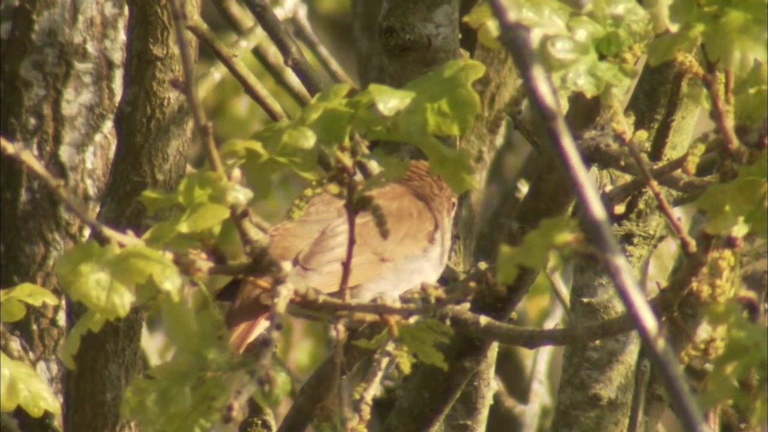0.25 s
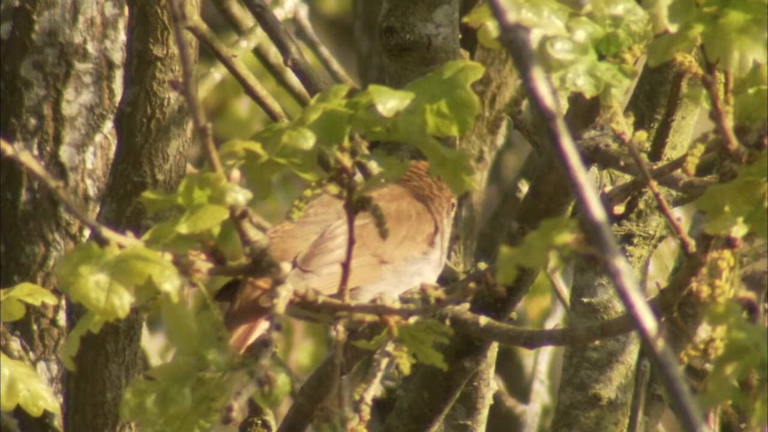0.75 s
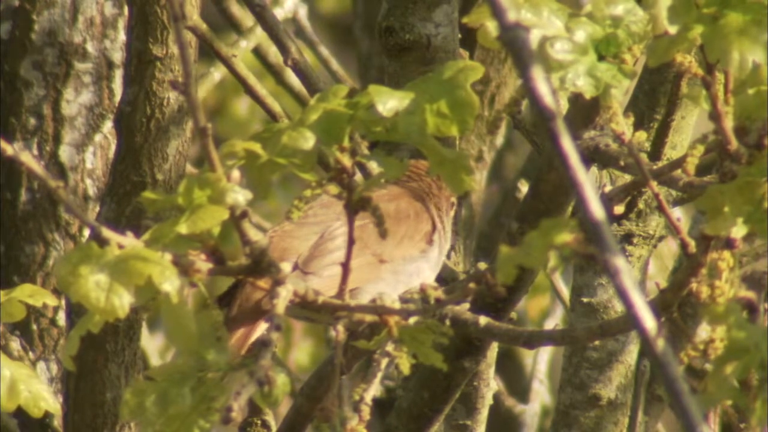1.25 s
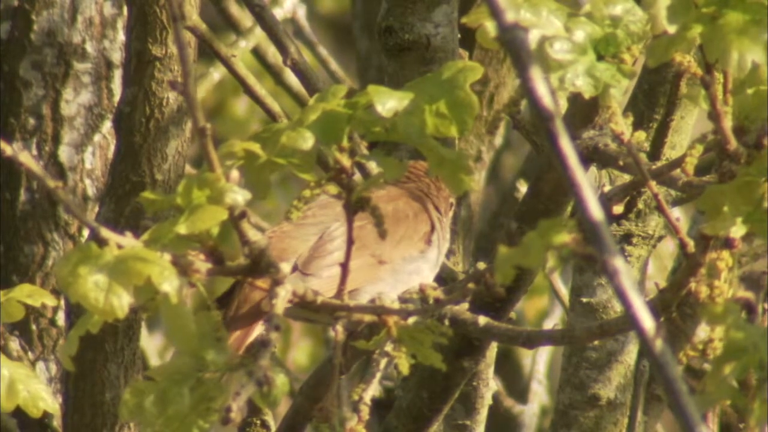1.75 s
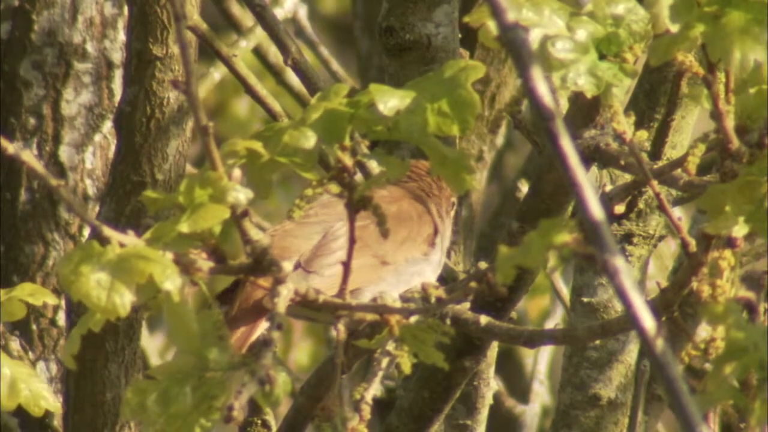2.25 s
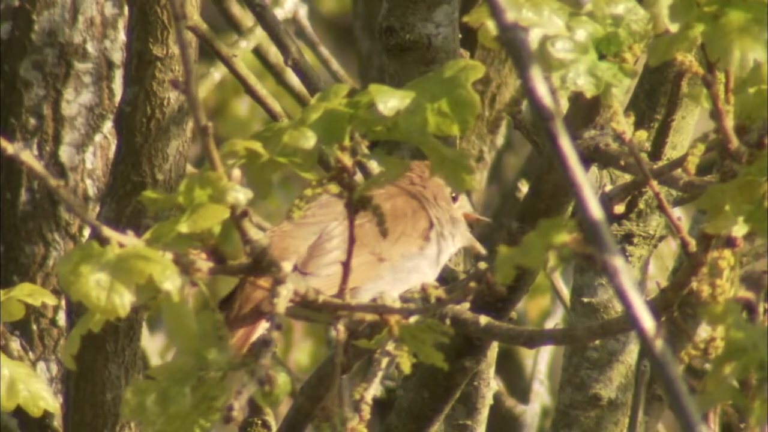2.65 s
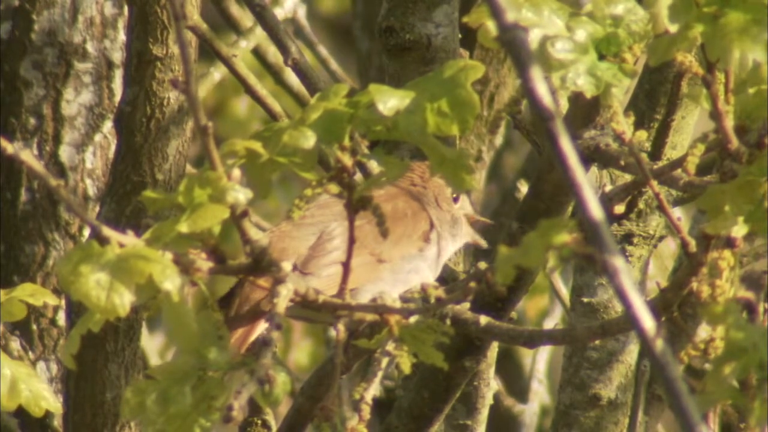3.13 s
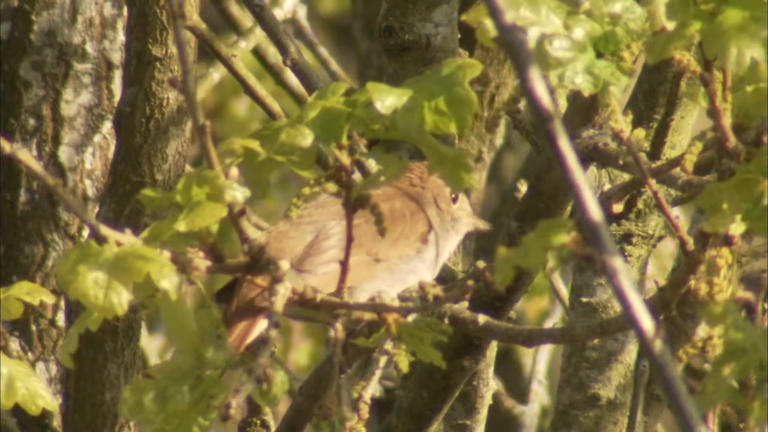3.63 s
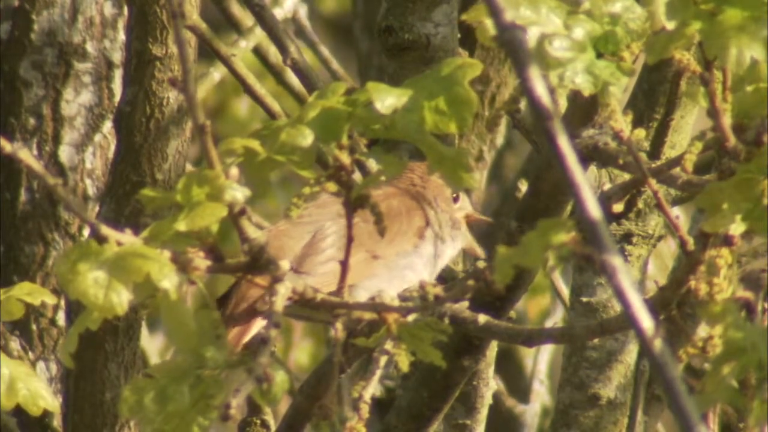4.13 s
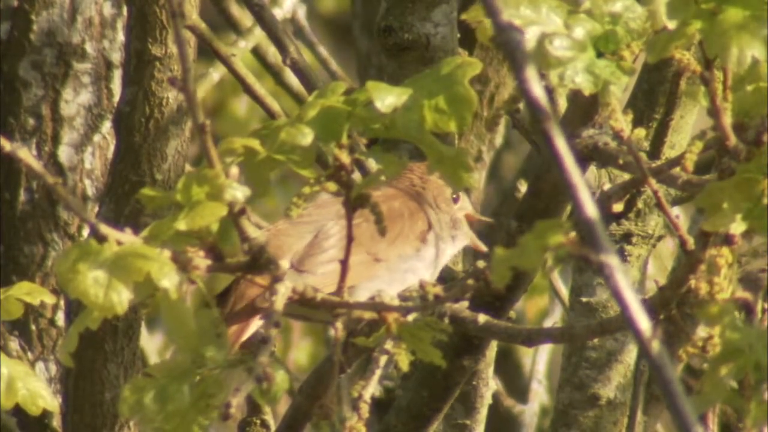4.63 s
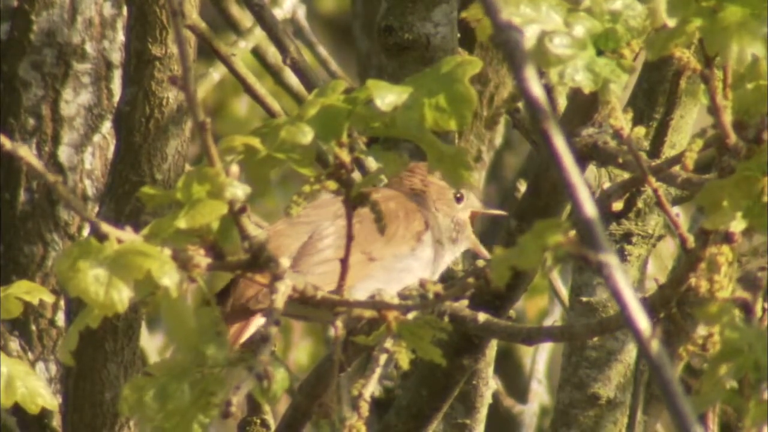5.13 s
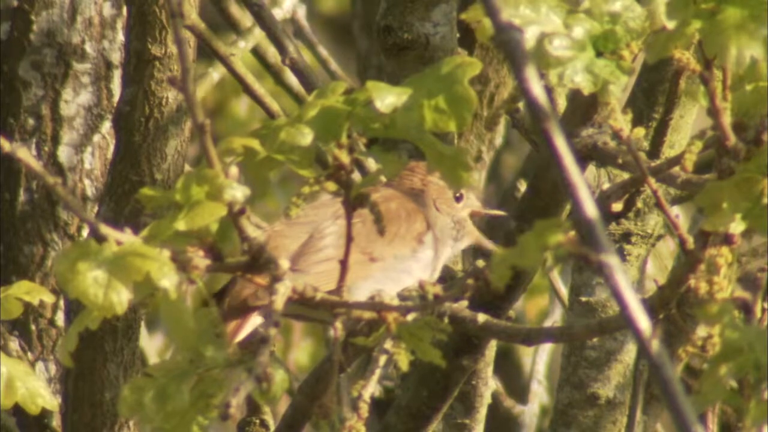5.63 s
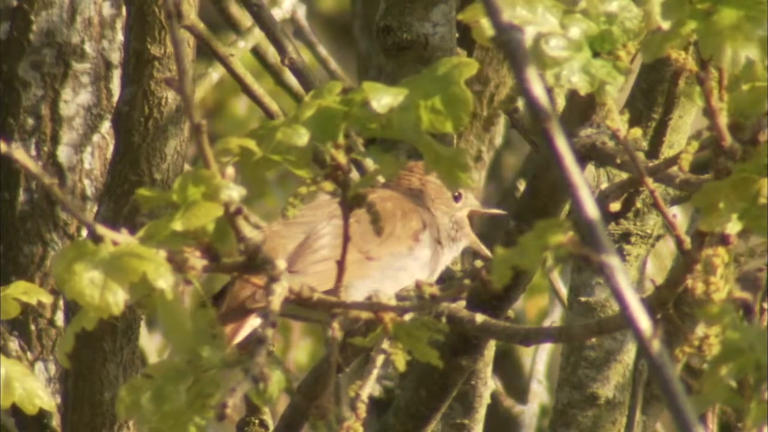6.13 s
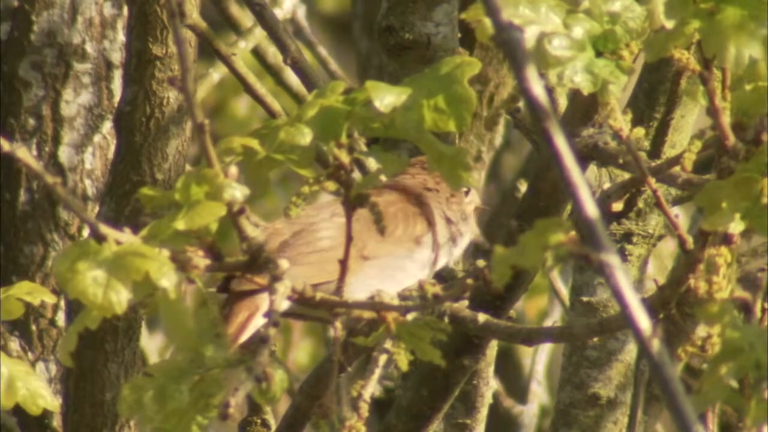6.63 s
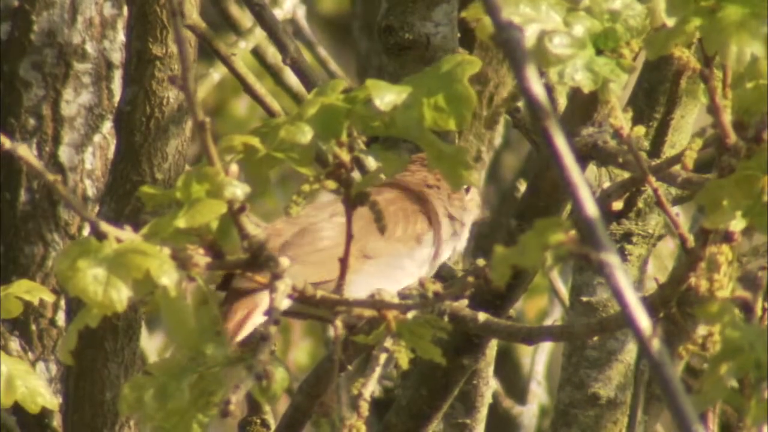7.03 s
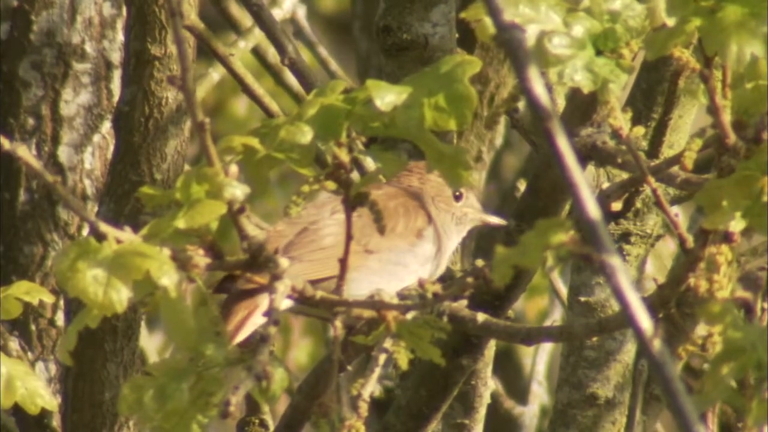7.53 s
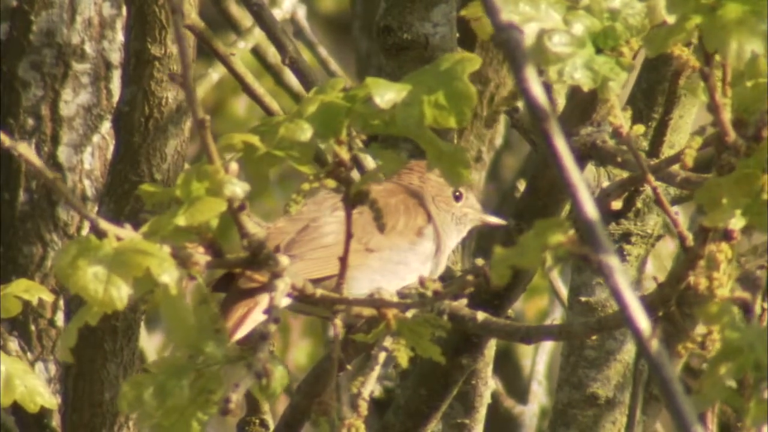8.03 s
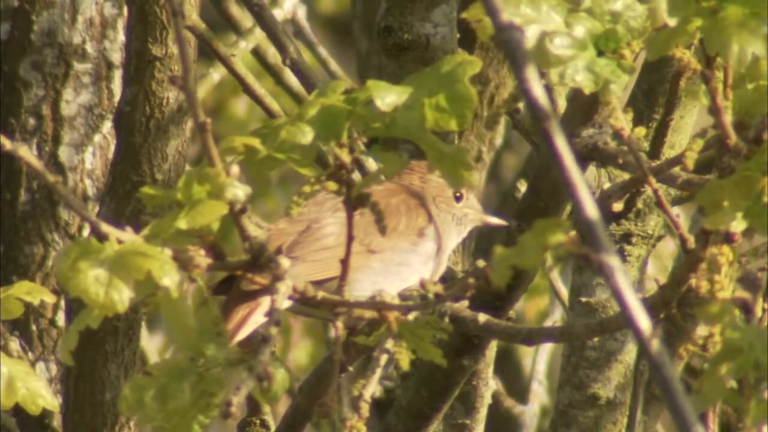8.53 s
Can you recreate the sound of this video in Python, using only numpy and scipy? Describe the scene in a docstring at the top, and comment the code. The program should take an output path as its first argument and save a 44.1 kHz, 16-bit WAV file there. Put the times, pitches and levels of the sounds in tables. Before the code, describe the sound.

A nightingale swells through a series of long high sliding whistles, then six loud low liquid loops, while a nearby bird warbles and rasps in echoing woodland.

```python
"""Nightingale in a spring thicket

A nightingale swells through a series of long high whistles, each sliding down onto its pitch, then breaks
into six loud low loops. A neighbour warbles, ticks and rasps across it; more birds sing deeper in the wood.
Birds are nearly pure tones on gliding pitch paths, and the wood's echo is two decaying bursts of noise.
Coloured noise makes the air, the rumble and the blurred chorus; a sine makes the faint hum.
"""
import sys
import numpy as np
from scipy import signal
from scipy.fft import rfft, irfft, next_fast_len
from scipy.io import wavfile
from scipy.ndimage import uniform_filter1d, map_coordinates

SR = 44100
rng = np.random.default_rng(int(sys.argv[2]) if len(sys.argv) > 2 else 0)


def int16_out(signal):
    """Quantize to a 16-bit WAV file."""
    q = np.round(np.clip(np.atleast_2d(signal).T, -1, 1) * 32767)
    wavfile.write(sys.argv[1], SR, q.astype(np.int16))


N = 386757
TIME = np.arange(N) / SR  # seconds

# Note levels are set ahead of envelopes, wavering and the echo mix; note pitches ahead of wavering.
# Colours are relative: each noise is scaled to unit power.

# still air, colour: [hz, db_per_hz]
AIR = [(20, -2), (55, 4.5), (90, 3), (200, 1), (400, -9), (600, -8.5), (850, -6), (1050, -10.5),
       (1300, -16.5), (2500, -21), (6000, -20), (9000, -33), (14500, -32)]
AIR_DB = -66
# distant rumble, level over time before its trim: [time_s, level_db]
RUMBLE_DB = [(0.0, -73), (1.02, -54.5), (1.63, -63), (1.95, -53), (2.88, -52.5), (5.15, -64.5),
             (5.59, -54.5), (5.71, -63), (6.42, -56), (6.47, -64.5), (7.5, -58), (7.64, -66), (8.72, -66),
             (8.77, -75)]
# distant rumble, colour: [hz, db_per_hz]
RUMBLE = [(30, -31), (70, -19.5), (100, -11), (122, -0.5), (135, 1), (150, -1), (180, -2.5), (200, -15),
          (225, -3), (250, 4), (295, -2), (335, -16.5), (500, -20), (1000, -73)]
# blurred chorus of the whole wood, level over time: [time_s, level_db]
CHORUS_DB = [(0, -65), (.7, -78), (1.2, -76), (1.7, -72), (2.3, -71), (2.8, -66), (3.4, -68), (3.9, -68),
             (4.4, -72.5), (5.2, -80.5), (6.2, -81), (7.6, -70.5), (8.7, -68.5)]
# blurred chorus, colour: [hz, db_per_hz]
CHORUS = [(900, -57), (1300, -14), (1800, -31), (2600, -10.5), (3500, 3.5), (4500, 5.5), (5500, -9),
          (7200, -22.5), (8500, -23), (11000, -71)]
# hum, level over time: [time_s, level_db]
HUM_DB = [(0, -82), (1.5, -72), (3, -75.5), (4.2, -70), (5.3, -78), (7, -78.5), (8.7, -73)]
HUM_HZ = 59.4
# the preamplifiers' own hiss, colour: [hz, db_per_hz]
HISS = [(1000, -5), (4000, -15), (8000, 1.5), (14500, -0.5)]
HISS_DB, CUTOFF_HZ = -84, 15000

# neighbour's slurs: [start_s, length_s, level_db, from_hz, to_hz, halfway_share]
SLURS = [(0, 0.049, -59, 5000, 3900, 0.96), (.043, 0.027, -43.5, 3530, 4000, 0.7),
         (.076, 0.026, -41, 3770, 2860, 0.19), (.11, 0.058, -40.5, 3335, 3427, 0.66),
         (.229, 0.017, -52, 2450, 2230, 0.8), (.306, 0.043, -45, 2774, 2662, 0.13),
         (.484, 0.035, -53, 4200, 3650, 0.43), (4.878, 0.024, -36, 4270, 3430, 0.73),
         (5.197, .036, -55.5, 10300, 7500, 0.34), (5.258, 0.023, -44, 4400, 6170, 0.84),
         (5.266, 0.05, -54.5, 2410, 3210, 0.08), (5.316, 0.028, -38, 3310, 5600, .68),
         (5.382, 0.021, -54, 2550, 2620, 0.24), (5.408, 0.026, -59, 1840, 1650, 0.46),
         (5.575, .05, -58, 2000, 1712, 0.09), (6.056, 0.014, -44, 4610, 2800, .38),
         (6.594, 0.016, -44.5, 4490, 4510, 0.3), (7.185, 0.052, -46.5, 3590, 4620, 0.3),
         (7.232, 0.019, -54, 6200, 9800, 0.8), (7.292, .016, -44, 3960, 4080, 0.6),
         (7.371, 0.018, -49, 3920, 3800, 0.4), (7.236, 0.025, -37, 3300, 5250, 0.17),
         (7.282, .016, -44, 3630, 9600, 0.4), (7.363, 0.01, -42.5, 4210, 9500, 0.6),
         (7.425, 0.016, -42.5, 2980, 4300, 0.5), (7.901, 0.0082, -48.5, 4390, 4440, .5),
         (7.913, 0.0056, -42, 5140, 5100, .5), (7.927, .012, -40, 7500, 5570, 0.06),
         (7.944, 0.0086, -44, 7420, 5350, .25), (7.961, 0.045, -40.5, 5640, 2660, 0.48),
         (8.108, 0.043, -38, 2770, 3830, 0.56), (8.363, 0.042, -41, 7530, 4450, 0.86),
         (8.6, 0.036, -54, 2160, 1940, 0.56), (8.69, 0.034, -37.5, 4540, 4890, 0.1),
         (8.722, 0.041, -36.5, 4200, 2780, 0.7)]
# neighbour's arched notes: [start_s, length_s, level_db, foot_hz, top_hz]
ARCHES = [(.245, 0.055, -44, 2415, 3606), (5.012, 0.072, -48.5, 1532, 2404),
          (6.143, 0.088, -48.5, 1590, 2420), (7.501, 0.052, -36, 3530, 4674),
          (7.63, 0.085, -50.5, 1573, 2330), (8.051, 0.025, -44.5, 2810, 4400),
          (8.083, 0.016, -37, 3140, 3666), (8.214, 0.033, -43, 3500, 5680),
          (8.244, 0.04, -42.5, 3550, 5090), (8.247, .04, -48, 4560, 7620), (8.488, 0.02, -52, 3300, 4120),
          (8.497, 0.014, -45, 2440, 3080), (8.581, 0.031, -54, 3130, 4160), (8.586, 0.01, -44, 2420, 3120)]
# neighbour's ticks, whipped up and straight down again: [start_s, length_s, level_db, foot_hz, top_hz]
TICKS = [(.44, 0.038, -49, 3285, 4790), (4.692, 0.037, -52, 3090, 6070), (5.497, 0.01, -48.5, 3620, 7300),
         (5.664, 0.009, -53, 3800, 7540), (6.356, 0.042, -47.5, 3800, 12100),
         (6.583, .044, -47, 3900, 12340), (8.341, 0.028, -46.5, 6600, 8450)]
# neighbour's burry, trilled notes: [start_s, length_s, level_db, from_hz, to_hz]
BURRS = [(.404, 0.012, -54.5, 2490, 2230), (2.563, .08, -56.5, 4410, 4230),
         (7.513, 0.032, -52.5, 5900, 5860), (8.512, 0.018, -56, 2280, 2170),
         (8.515, 0.017, -59, 3070, 2760), (8.6, .026, -56, 2118, 2020), (8.666, 0.0246, -41.5, 4740, 4300),
         (8.7, 0.025, -66, 6040, 5980)]
# neighbour's hoarse rasps: [start_s, length_s, level_db, from_hz, to_hz]
RASPS = [(7.172, 0.059, -50, 3630, 5560), (7.289, .034, -40.5, 3800, 4600),
         (7.368, 0.032, -40.5, 3710, 4640)]

# slurs deeper in the wood: [start_s, length_s, level_db, from_hz, to_hz]
FAR_SLURS = [(0, 0.076, -65, 7100, 6080), (0, 0.059, -62.5, 2830, 2860), (.15, .05, -68, 5350, 4900),
             (.2, 0.065, -71.5, 5070, 4640), (.178, 0.048, -70.5, 7200, 6230), (.57, .06, -76, 5750, 6530),
             (1.09, 0.067, -62.5, 2510, 1880), (1.095, 0.1, -74, 7900, 7530), (1.6, .03, -68, 6000, 8200),
             (1.29, 0.033, -68, 7960, 7360), (1.4, .08, -75, 3450, 4050), (2.16, 0.031, -67, 6760, 5640),
             (2.545, .05, -69, 6500, 5800), (3.18, 0.092, -77, 7600, 7100), (3.38, 0.15, -70, 7250, 6000),
             (3.6, 0.08, -71.5, 6980, 5600), (4.35, 0.17, -63, 4390, 3730), (4.555, 0.076, -68, 6200, 5970),
             (4.578, 0.066, -64, 2710, 1860), (4.93, 0.071, -66, 1700, 2410),
             (5.36, 0.078, -65, 3030, 2440), (5.91, 0.14, -62.5, 3300, 3980),
             (3.97, 0.045, -64, 4940, 3740), (4.02, 0.045, -63, 3700, 4400), (4.0, 0.1, -73, 6500, 6150),
             (6.07, 0.072, -68.5, 6450, 6320), (6.24, .06, -63, 2600, 3110),
             (6.36, 0.065, -61.5, 3350, 3170), (6.35, 0.21, -69.5, 7280, 6090),
             (6.67, 0.047, -60, 4260, 3920), (7.73, 0.11, -63.5, 4480, 3700),
             (7.775, 0.032, -69, 7500, 7240)]
# far arched notes: [start_s, length_s, level_db, foot_hz, top_hz]
FAR_ARCHES = [(1.78, .15, -60, 3080, 3797), (2.02, 0.16, -61, 3140, 3680), (2.33, .12, -63.5, 3410, 3900),
              (3.06, 0.11, -76, 6300, 6950), (3.23, 0.15, -72, 6030, 6760), (3.73, 0.46, -75.5, 7060, 7350),
              (8.16, 0.11, -63.5, 2130, 2330)]
# far pointed notes: [start_s, length_s, level_db, foot_hz, top_hz, apex_share]
FAR_PEAKS = [(1.435, 0.076, -57, 3500, 7100, 0.28), (1.6, 0.092, -56, 3320, 7000, 0.28),
             (2.265, 0.034, -60, 2570, 3550, 0.7), (2.39, 0.064, -62.5, 2320, 3500, 0.4),
             (2.525, 0.095, -65.5, 2500, 3500, 0.55), (3.67, .115, -61, 2380, 3500, 0.6),
             (3.84, 0.13, -64.5, 2260, 3450, 0.8), (4.01, 0.14, -65, 2300, 3530, 0.62)]
# a far run of scoops: [start_s, length_s, level_db, base_hz]
SCOOPS = [(2.635, 0.21, -62.5, 2350), (2.895, .095, -54, 3305), (3.068, .1, -55, 3370),
          (3.265, .115, -57.5, 3290), (3.45, 0.16, -55, 3185)]
# the scoops' shared shape, at even steps: [pitch_ratio to base_hz]
SCOOP = [1.22, 1, 1.04, 1.4, 1.72]
# a far run of rising hooks: [start_s, length_s, level_db, base_hz]
HOOKS = [(.728, 0.097, -67.5, 4950), (.9, 0.11, -67.5, 4800), (1.08, .085, -60.5, 4850),
         (1.26, .08, -57, 4910)]
# the hooks' shared shape, at even steps: [pitch_ratio to base_hz]
HOOK = [1.1, .99, 1.2, 1.3, 1.41, 1.46]
# the farthest whistler: [start_s, length_s, level_db, from_hz, to_hz]
BLURRED = [(.31, 0.026, -70, 2240, 1870), (.37, 0.086, -72, 1700, 2110), (.51, .035, -63, 2176, 1730),
           (.56, 0.033, -69, 2216, 1640), (.6, 0.034, -65.5, 2360, 1680), (.64, 0.036, -75, 2080, 1600),
           (.72, 0.052, -68.5, 2900, 2400), (.81, 0.078, -67, 2380, 2620), (.9, 0.087, -65.5, 2890, 3260),
           (1.0, 0.043, -65, 3240, 2900), (1.05, 0.036, -64, 3020, 2530), (1.19, 0.19, -69, 1945, 1700),
           (2.18, 0.072, -68.5, 2420, 2360), (2.45, 0.045, -67, 2110, 2020), (3.39, 0.068, -73, 2050, 1530),
           (3.87, 0.1, -69, 2130, 1750), (4.48, 0.049, -76, 2000, 1780), (4.63, 0.1, -67.5, 2154, 1800),
           (4.76, .2, -72, 2560, 2470), (4.86, 0.043, -67, 2210, 1634), (5.1, 0.14, -74.5, 2230, 2430)]

# nightingale's whistles: [start_s, final_pitch_hz, level_db]
WHISTLES = [(.92, 5100, -64), (1.31, 4930, -55), (1.565, 4820, -52.5), (1.82, 4896, -51.5),
            (2.104, 5000, -51.5), (2.385, 4920, -50.5), (2.662, 4814, -47.5), (2.94, 4865, -49),
            (3.22, 4820, -47), (3.505, 4715, -46.5), (3.817, 4733, -46.5), (4.122, 4760, -47),
            (4.42, 4626, -44), (4.736, 4576, -43.5), (5.077, 4624, -42.5), (5.423, 4610, -41.5),
            (5.742, 4676, -42), (6.092, 4624, -41)]
# swell of one whistle: [share_of_note, level_db]
WHISTLE_SWELL = [(0, -14), (.2, -7.5), (.45, -4), (.75, -1), (.92, -4.5), (1, -9)]
# each whistle is longer than the last; its third harmonic grows faster than its level
FIRST_WHISTLE_S, LAST_WHISTLE_S = 0.1, 0.24
FULL_VOICE_DB, THIRD_DB, THIRD_DB_PER_DB = -39.5, -16, 0.5
# nightingale's low loops: [start_s, level_db, pitch_factor]
LOOPS = [(6.392, -33.5, 1.), (6.545, -32.5, 1.), (6.699, -32.5, 0.99), (6.849, -32, 0.99),
         (6.999, -32.5, 0.98), (7.142, -33.5, 0.98)]
# one loop, timed from its start: [time_s, pitch_hz before the factor, level_db]
LOOP = [(0, 2230, -15), (.006, 1695, -14), (0.019, 1280, -21.5), (0.034, 1900, -10.5), (0.045, 2277, -6.5),
        (.052, 2468, 2.5), (.064, 2560, -1.5), (0.073, 2650, 0.5), (0.092, 2497, -18)]
# a brief dip in each loop, where a close echo cancels the climbing tone
DIP_S, DIP_WIDTH_S, DIP_DB = 0.056, 0.0021, -15
# single echoes from nearby trunks and the ground: [delay_s, level_db]
TRUNKS = [(.0042, -8.5), (0.0125, -17), (0.0306, -14)]


def from_db(db):
    """Decibels to gain."""
    return 10 ** (np.asarray(db) / 20)


def rms_one(x):
    """Scale to unit power."""
    return x / np.sqrt(np.mean(x ** 2) + 1e-20)


def curve(rows, at):
    """Join (x, value) rows by straight lines."""
    return np.interp(at, *np.transpose(rows))


def add(track, s, sound):
    """Mix a sound into a track at s seconds."""
    start = max(round(s * SR), 0)
    track[start:start + len(sound)] += sound[:N - start]


def noise(spectrum):
    """Noise of a given colour, rms 1; the colour is joined over log frequency."""
    size = next_fast_len(N)
    hz, db = np.transpose(spectrum)
    bins = np.maximum(np.fft.rfftfreq(size, 1 / SR), 1)
    gain = from_db(np.interp(np.log(bins), np.log(hz), db))
    return rms_one(irfft(gain * rfft(rng.standard_normal(size)))[:N])


def flutter(rate_hz):
    """Random wavering up to a given rate, rms 1."""
    low_pass = signal.butter(2, rate_hz, fs=SR, output="sos")
    return rms_one(signal.sosfilt(low_pass, rng.standard_normal(N)))


def glide(pitches, share):
    """A smooth pitch path through evenly spaced points."""
    position = share * (len(pitches) - 1)
    return np.exp(map_coordinates(np.log(pitches), [position], order=3, mode="nearest"))


def arch(share, crest, ends_db):
    """An envelope at 0 dB on the crest, curving away to ends_db at both ends."""
    crest = np.clip(crest, .05, .95)
    distance = np.maximum(1 - share / crest, (share - crest) / (1 - crest))
    return from_db(ends_db * distance ** 2)


def syrinx(hz, overtones_db, edge_s=0.0014):
    """A bird's voice: a nearly pure tone on a pitch path, with any weak harmonics and soft ends."""
    phase, t = 2 * np.pi * np.cumsum(hz) / SR, np.arange(len(hz)) / SR
    tone = np.sin(phase)
    for k, db in enumerate(overtones_db, 2):
        below_nyquist = k * hz < SR / 2
        tone = tone + from_db(db) * np.sin(k * phase) * below_nyquist
    edge = np.clip(np.minimum(t, t[-1] - t) / edge_s, 0, 1)
    return tone * np.sin(np.pi / 2 * edge) ** 2


def wood(x, direct_db, leaves_db, tail_db, leaves_t60=0.054, tail_t60=0.71, treble_t60=0.42,
         treble_hz=6000, build_s=0.0069):
    """Direct sound, a quick scatter from nearby leaves and a longer tail from trees, its treble dying first."""
    t = np.arange(SR) / SR
    leaves, trees = rng.standard_normal((2, SR))
    leaves = rms_one(leaves * from_db(-60 * t / leaves_t60) * (t > .003))
    dull = signal.sosfiltfilt(signal.butter(2, treble_hz, fs=SR, output="sos"), trees)
    bright = trees - dull
    trees = dull * from_db(-60 * t / tail_t60) + bright * from_db(-60 * t / treble_t60)
    trees = rms_one(trees * (1 - np.exp(-t / build_s)))
    response = (from_db(leaves_db) * leaves + from_db(tail_db) * trees) / np.sqrt(SR)
    return from_db(direct_db) * x + signal.fftconvolve(x, response)[:N]


def trunks(x):
    """Short echoes beat against a gliding note and make it throb."""
    return x + sum(from_db(db) * np.interp(TIME - delay, TIME, x, left=0) for delay, db in TRUNKS)


def patchy(x, depth_db=3, rate_hz=9):
    """Half-octave bands fade in and out on their own."""
    out, edges = 0, 1000 * 2 ** (np.arange(8) / 2)
    for low, high in zip(edges, edges[1:]):
        band = signal.sosfilt(signal.butter(2, [low, high], "band", fs=SR, output="sos"), x)
        out = out + band * from_db(depth_db * flutter(rate_hz))
    return rms_one(out)


def background(rumble_trim_db=-1.52, rumble_waver_db=1.5):
    """Coloured noises for air, wavering rumble and patchy chorus, plus a sine hum."""
    air = from_db(AIR_DB) * noise(AIR)
    rumble_db = curve(RUMBLE_DB, TIME) + rumble_trim_db + rumble_waver_db * flutter(rate_hz=20.7)
    rumble = from_db(rumble_db) * noise(RUMBLE)
    chorus = from_db(curve(CHORUS_DB, TIME)) * patchy(noise(CHORUS))
    hum = from_db(curve(HUM_DB, TIME)) * np.sqrt(2) * np.sin(2 * np.pi * HUM_HZ * TIME)
    return air + rumble + chorus + hum


def slur(share, from_hz, to_hz, halfway=0.55):
    """The pitch moves one way, early or late in the note."""
    halfway = np.clip(halfway, .05, .95)
    done = share * (1 - halfway)
    return from_hz * (to_hz / from_hz) ** (done / (done + (1 - share) * halfway))


def bow(share, foot_hz, top_hz):
    """The pitch rises over a round top and comes down again."""
    return foot_hz + (top_hz - foot_hz) * np.sin(np.pi * share)


def bell(share, foot_hz, top_hz, steepness=1.7):
    """The pitch leaves its foot slowly, whips over the top and lands again."""
    return foot_hz * (top_hz / foot_hz) ** (np.abs(np.sin(np.pi * share)) ** steepness)


def peak(share, foot_hz, top_hz, apex, sharpness=1.45):
    """The pitch rises ever faster to a point and drops away from it."""
    climb = np.interp(share, [0, np.clip(apex, .05, .95), 1], [0, 1, 0])
    return foot_hz * (top_hz / foot_hz) ** (climb ** sharpness)


def scoop(share, base_hz):
    """A dip, then a long climb."""
    return base_hz * glide(SCOOP, share)


def hook(share, base_hz):
    """A low start, a quick climb and a flatter top."""
    return base_hz * glide(HOOK, share)


def near_notes(rows, path, rough, overtone_db, ends_db, crest, lean=0, pulsing=0, pulse_hz=330,
               pitch_scatter=0.152, level_scatter=0.25, third_db=-4, beak_hz=9400):
    """Close notes: in rough ones the membranes flap unevenly, in trilled ones they pulse."""
    out, jitter, shimmer = np.zeros(N), flutter(rate_hz=1470), flutter(rate_hz=1100)
    for s, length, db, *form in rows:
        share = np.linspace(0, 1, int(length * SR))
        at = (int(s * SR) + np.arange(len(share))) % N
        hz = path(share, *form)
        # rising notes crest later by `lean`, falling ones earlier
        note_crest = crest + lean * np.sign(hz[-1] - hz[0])
        level = from_db(db) * arch(share, note_crest, ends_db)
        level = level * (1 + level_scatter * rough * shimmer[at])
        level = level * (1 + np.clip(pulsing, 0, 1) * np.sin(2 * np.pi * pulse_hz * length * share))
        hz = hz * np.exp(pitch_scatter * rough * jitter[at])
        reach = 1 / np.sqrt(1 + (hz / beak_hz) ** 10)  # the voice thins out at the top of its range
        add(out, s, level * reach * syrinx(hz, [overtone_db, overtone_db + third_db]))
    return out


def neighbour():
    """A warble of clear slurs and arches, sharp ticks, pulsing burrs and hoarse rasps."""
    clear = near_notes(SLURS, slur, rough=0.075, overtone_db=-32.5, ends_db=-7.5, crest=0.72, lean=0.1)
    arched = near_notes(ARCHES, bow, rough=0.12, overtone_db=-29.5, ends_db=-15, crest=.6)
    ticks = near_notes(TICKS, bell, rough=0.24, overtone_db=-34, ends_db=2.5, crest=1.0, beak_hz=6760)
    burrs = near_notes(BURRS, slur, rough=0.34, overtone_db=-29.5, ends_db=-2.5, crest=.62,
                       pulsing=0.47, pulse_hz=342)
    rasps = near_notes(RASPS, slur, rough=0.98, overtone_db=-12, ends_db=-6.5, crest=1.0)
    return clear + arched + ticks + burrs + rasps


def far_notes(rows, path, ends_db, crest, waver=0.0055, fading_db=2.5):
    """Distance leaves only the pure glides, which fade unevenly."""
    out, unsteady, fading = np.zeros(N), flutter(rate_hz=180), flutter(rate_hz=60)
    for s, length, db, *form in rows:
        share = np.linspace(0, 1, int(length * SR))
        at = (int(s * SR) + np.arange(len(share))) % N
        hz = path(share, *form) * (1 + waver * unsteady[at])
        level = from_db(db + fading_db * fading[at]) * arch(share, crest, ends_db)
        add(out, s, level * syrinx(hz, []))
    return out


def far_birds():
    """Five kinds of pure gliding note from deeper in the wood."""
    return (far_notes(FAR_SLURS, slur, ends_db=-2, crest=1.0)
            + far_notes(FAR_ARCHES, bow, ends_db=-6.5, crest=0.2)
            + far_notes(FAR_PEAKS, peak, ends_db=-11, crest=0.57)
            + far_notes(SCOOPS, scoop, ends_db=-18.5, crest=0.82)
            + far_notes(HOOKS, hook, ends_db=-6, crest=0.51))


def far_twitter(count=130, over_chorus_db=1, spread_db=3, low_hz=1900, high_hz=6200, bend=.1):
    """Short stray chirps on random bent glides, their levels following the chorus."""
    out = np.zeros(N)
    chances = np.c_[rng.random((count, 3)), rng.standard_normal((count, 4))]
    for when, length, height, loud, *bends in chances:
        s = when * N / SR
        share = np.linspace(0, 1, int((.02 + .05 * length) * SR))
        pitches = low_hz * (high_hz / low_hz) ** height * np.exp(bend * np.array(bends))
        db = curve(CHORUS_DB, s) + over_chorus_db + spread_db * loud
        add(out, s, from_db(db) * np.sin(np.pi * share) * syrinx(glide(pitches, share), []))
    return out


def farthest_whistler():
    """Pure slurs blurred by a strong pitch waver."""
    return far_notes(BLURRED, slur, ends_db=1.5, crest=.5, waver=0.031)


def whistles(slide_hz=650, settle_s=.038, waver=0.0055, second_db=-28, shimmer_db=4.0):
    """Each whistle slides down onto its pitch, swells and trembles; louder ones gain a third harmonic."""
    out, unsteady, tremble = np.zeros(N), flutter(rate_hz=110), flutter(rate_hz=81)
    lengths = np.linspace(FIRST_WHISTLE_S, LAST_WHISTLE_S, len(WHISTLES))
    for (s, final_hz, db), length in zip(WHISTLES, lengths):
        t = np.arange(int(length * SR)) / SR
        at = int(s * SR) + np.arange(len(t))
        hz = (final_hz + slide_hz * np.exp(-t / settle_s)) * (1 + waver * unsteady[at])
        swell_db = curve(WHISTLE_SWELL, t / length)
        third_db = THIRD_DB + THIRD_DB_PER_DB * (db - FULL_VOICE_DB) + swell_db
        level = from_db(db + swell_db + shimmer_db * tremble[at])
        add(out, s, level * syrinx(hz, [second_db, third_db]))
    return out


def far_chatter(count=26, from_s=3.1, to_s=4.85, level_db=-66, length_s=0.023, pitch_hz=2500,
                spread=0.17, drop=.78):
    """A far bird runs through a loose string of short falling chips."""
    late, loud, high = rng.standard_normal((count, 3)).T
    times = np.linspace(from_s, to_s, count) + length_s * late
    levels_db = level_db + 2 * loud
    pitches = pitch_hz * np.exp(spread * high)
    rows = [(s, length_s, db, hz, hz * drop) for s, db, hz in zip(times, levels_db, pitches)]
    return far_notes(rows, slur, ends_db=-29, crest=0.25)


def loops(waver=0.0027, second_db=-35, third_db=-46, fourth_db=-44, buzz_db=-33, buzz_hz=12000,
          buzz_width_hz=470, buzz_at_s=0.048, buzz_spread_s=0.0098):
    """The pitch falls, then climbs through a brief echo dip; high harmonics buzz in a beak resonance."""
    out, unsteady = np.zeros(N), flutter(rate_hz=350)
    times, pitch_hz, shape_db = np.transpose(LOOP)
    t = np.arange(int(times[-1] * SR)) / SR
    path = uniform_filter1d(np.interp(t, times, pitch_hz), size=180)  # rounds the corners
    swell_db = np.interp(t, times, shape_db)
    dip_db = DIP_DB * np.exp(-((t - DIP_S) / DIP_WIDTH_S) ** 2)
    # less the swell, so the buzz keeps its own loudness on the climb
    burst_db = buzz_db - swell_db - ((t - buzz_at_s) / buzz_spread_s) ** 2
    for s, db, factor in LOOPS:
        hz = path * factor * (1 + waver * unsteady[int(s * SR):][:len(t)])
        buzz = [burst_db - ((k * hz - buzz_hz) / buzz_width_hz) ** 2 for k in range(5, 10)]
        level = from_db(db + swell_db + dip_db)
        add(out, s, level * syrinx(hz, [second_db, third_db, fourth_db, *buzz]))
    return out


def scene():
    """All birds reach one microphone, so both channels are alike."""
    near = wood(trunks(neighbour()), direct_db=-2, leaves_db=-5.5, tail_db=-16.0)
    far = wood(far_birds(), direct_db=-1.5, leaves_db=-7, tail_db=-5.0)
    twitter = wood(far_twitter(), direct_db=-5, leaves_db=-11, tail_db=-5)
    farthest = wood(farthest_whistler() + far_chatter(), direct_db=-2.5, leaves_db=-8.5, tail_db=-7.5)
    high = wood(whistles(), direct_db=-1.5, leaves_db=-7.5, tail_db=-11.5)
    low = wood(trunks(loops()), direct_db=0, leaves_db=-14, tail_db=-17.5)
    return np.tile(background() + near + far + twitter + farthest + high + low, (2, 1))


def record(dry):
    """Each channel adds a faint hiss of its own; the top is cut steeply."""
    hiss = from_db(HISS_DB) * np.array([noise(HISS), noise(HISS)])
    top_cut = signal.ellip(10, .1, 80, CUTOFF_HZ, fs=SR, output="sos")
    return signal.sosfilt(top_cut, dry + hiss)


dry = scene()
out = record(dry)
int16_out(out)
```